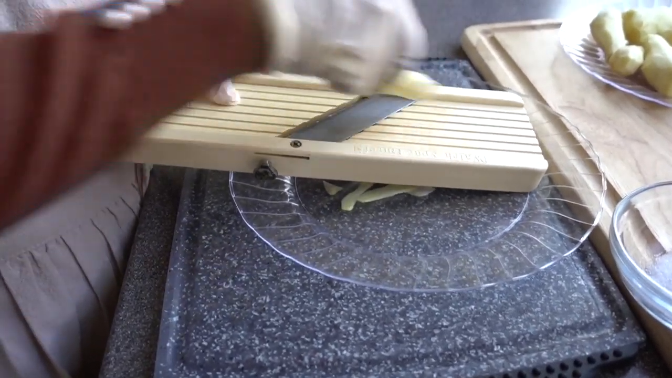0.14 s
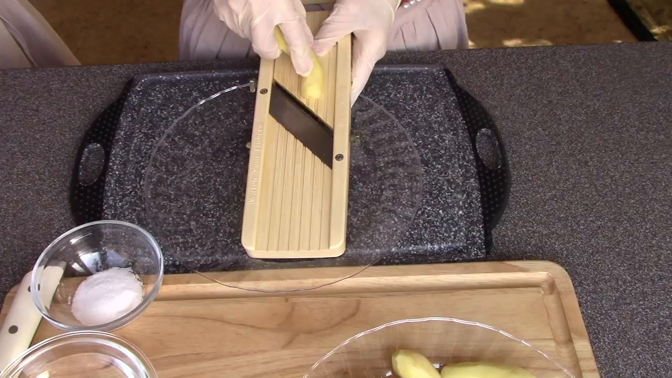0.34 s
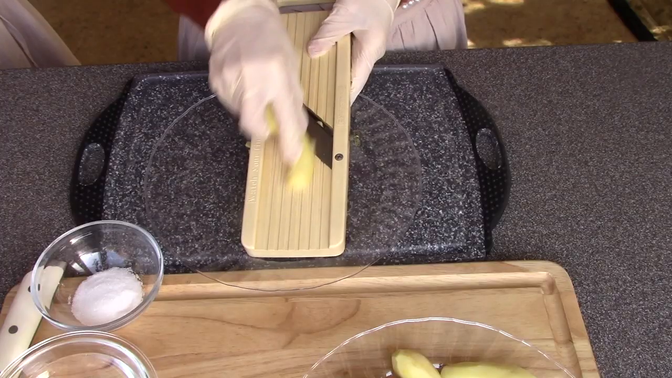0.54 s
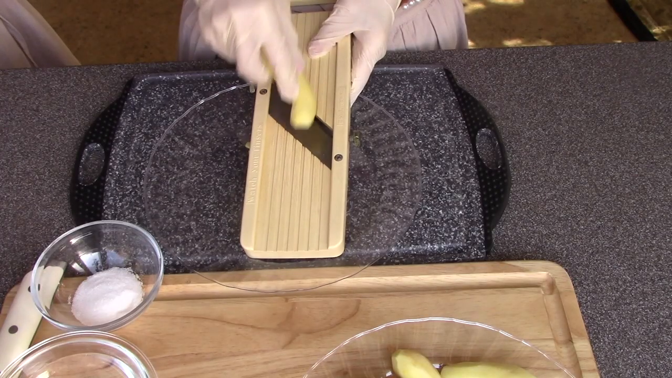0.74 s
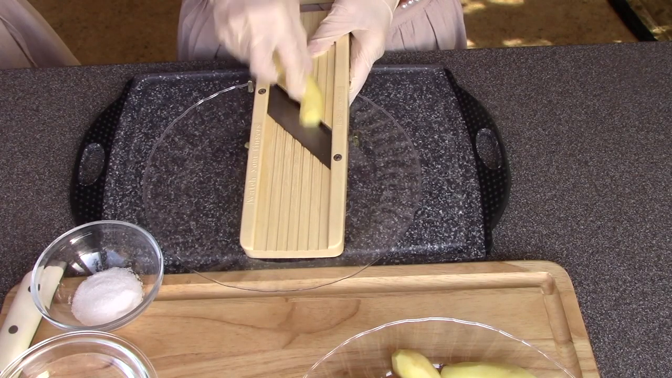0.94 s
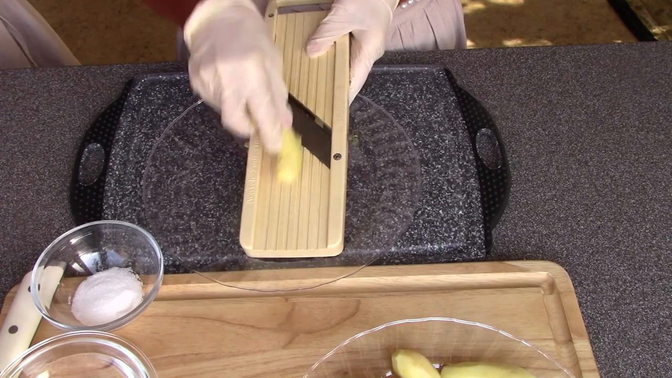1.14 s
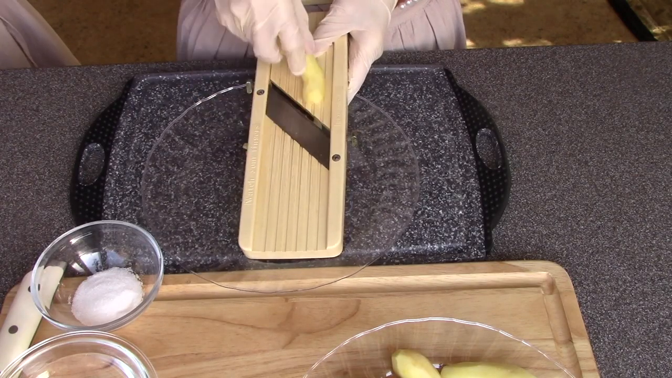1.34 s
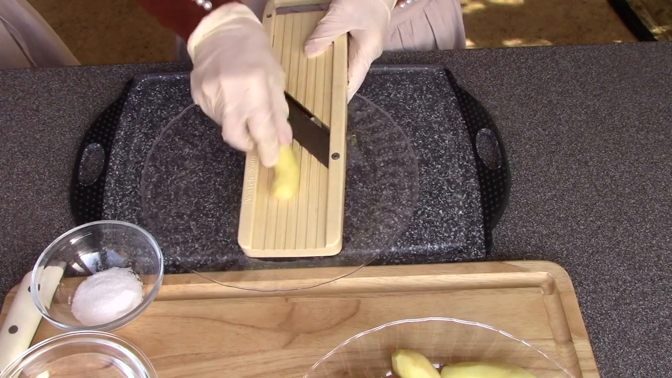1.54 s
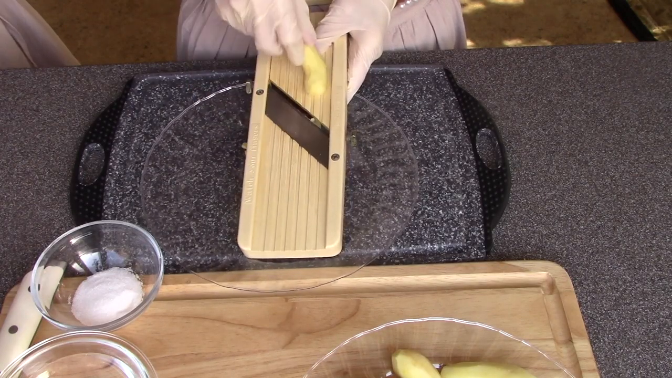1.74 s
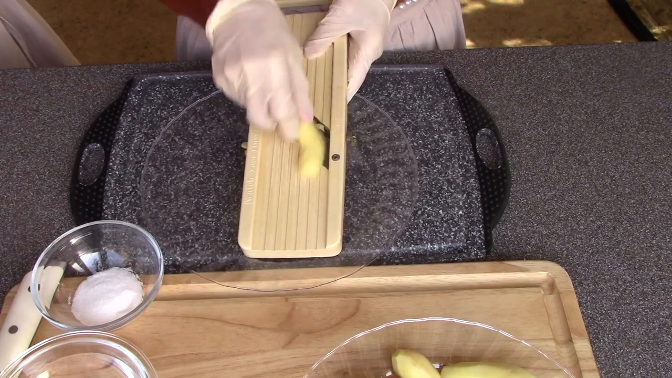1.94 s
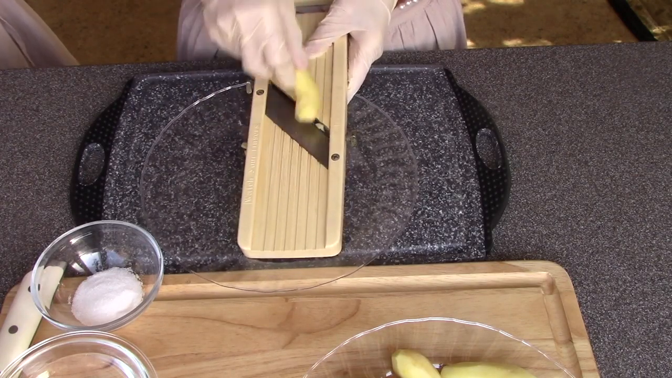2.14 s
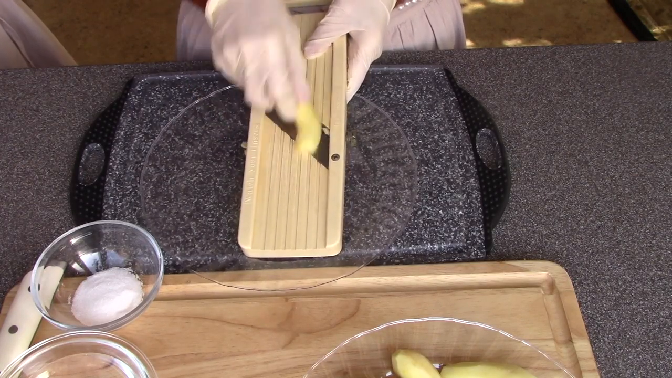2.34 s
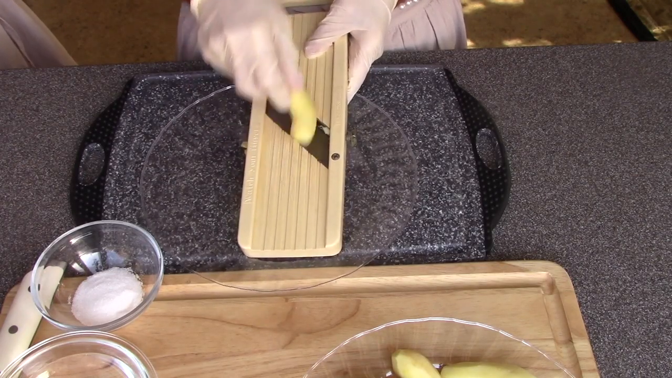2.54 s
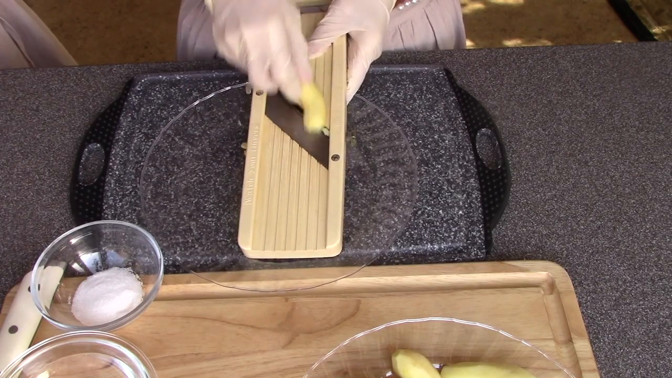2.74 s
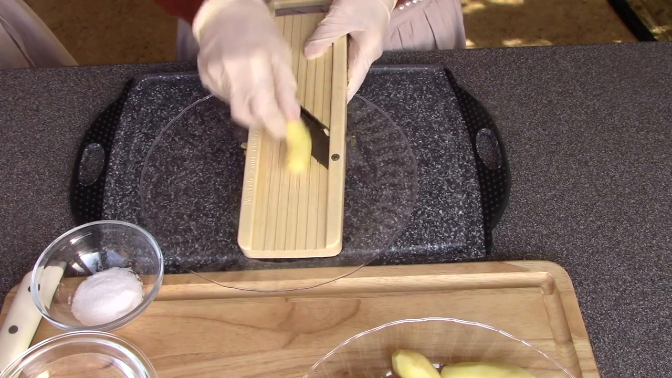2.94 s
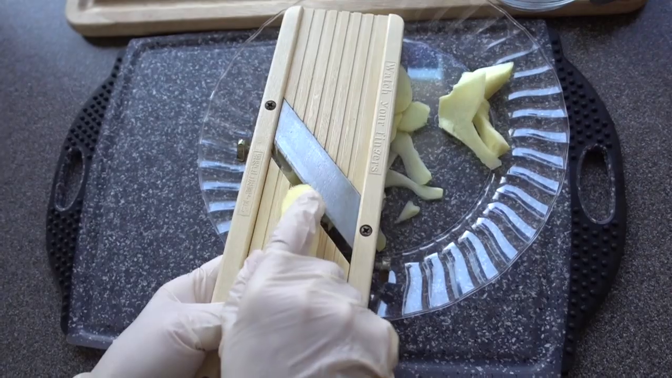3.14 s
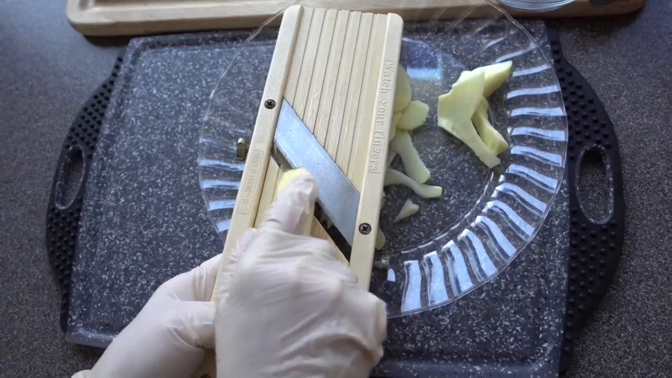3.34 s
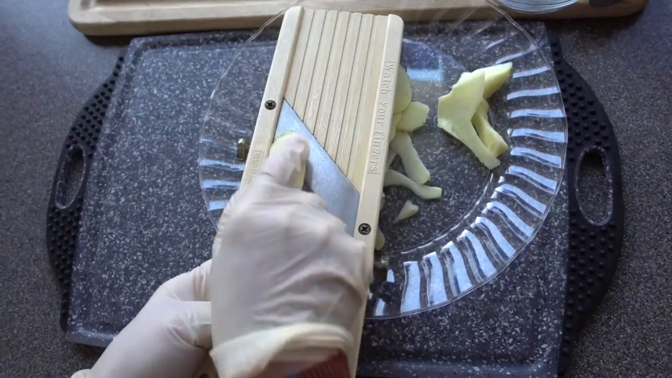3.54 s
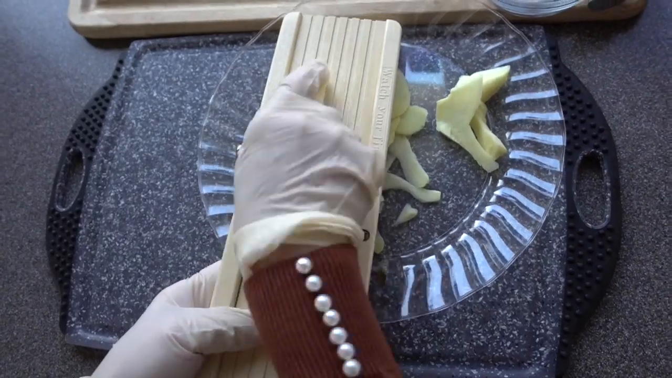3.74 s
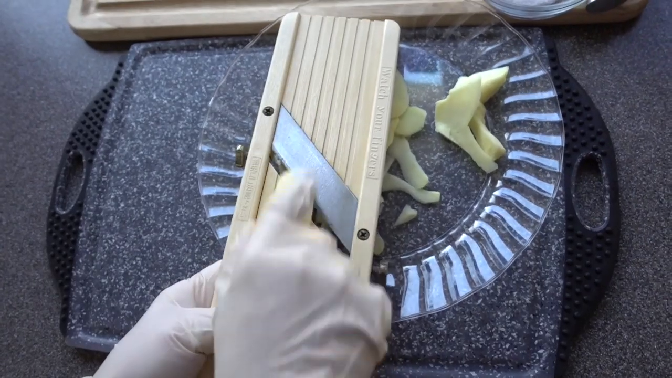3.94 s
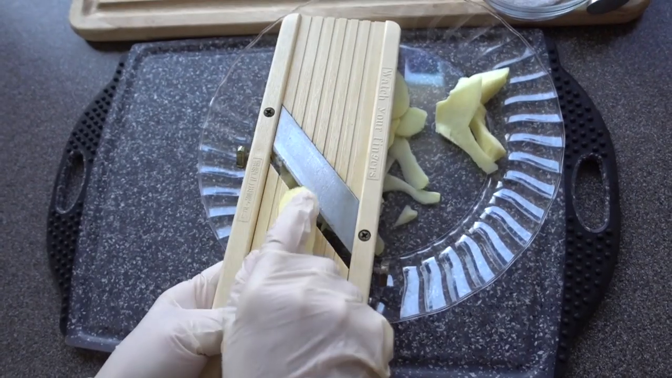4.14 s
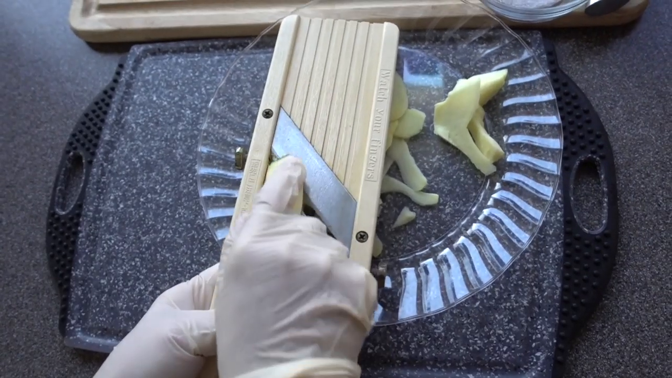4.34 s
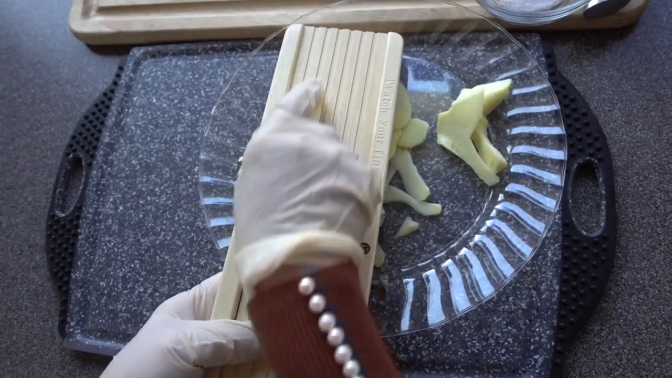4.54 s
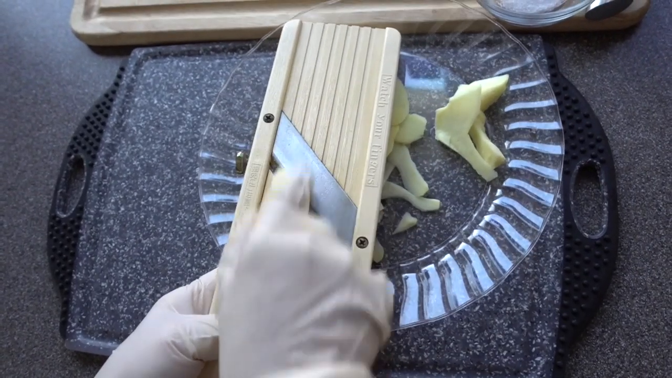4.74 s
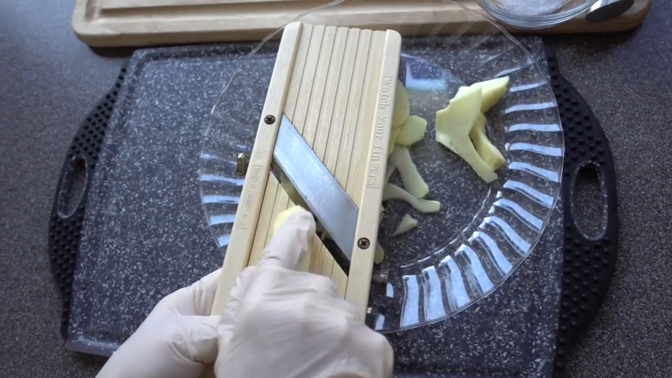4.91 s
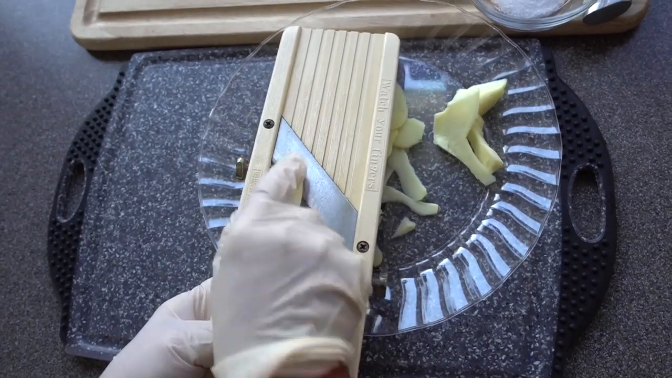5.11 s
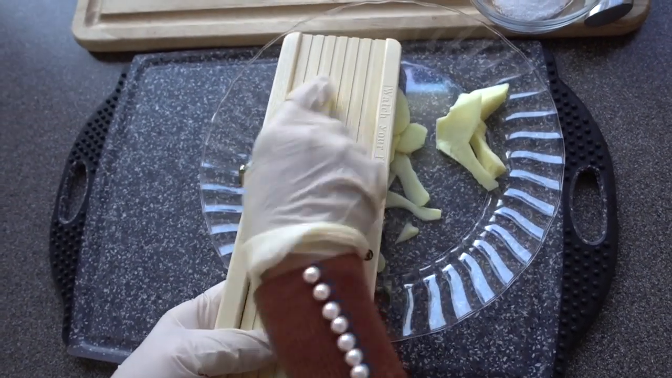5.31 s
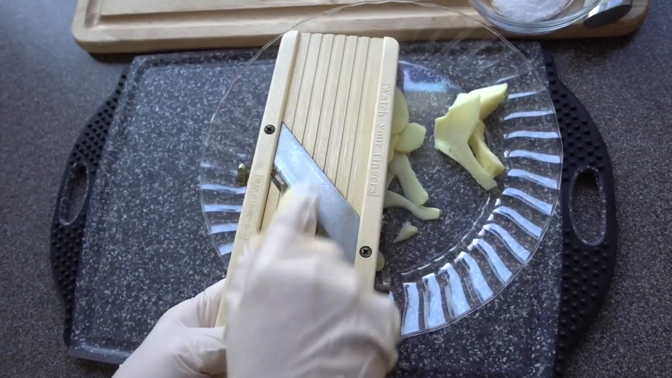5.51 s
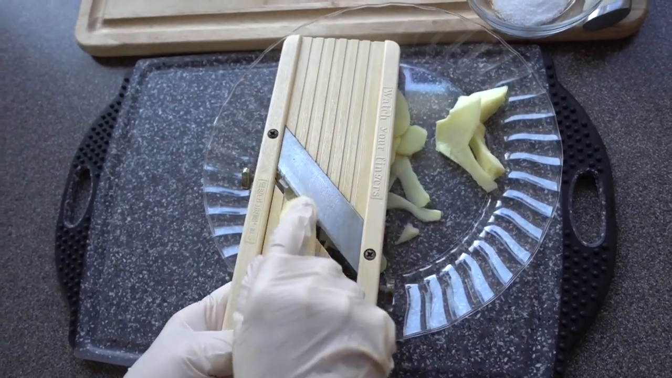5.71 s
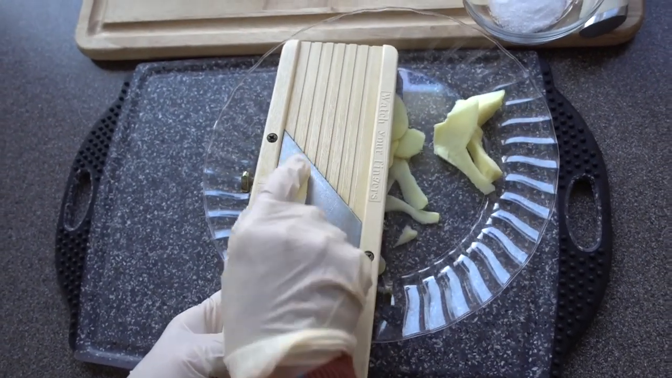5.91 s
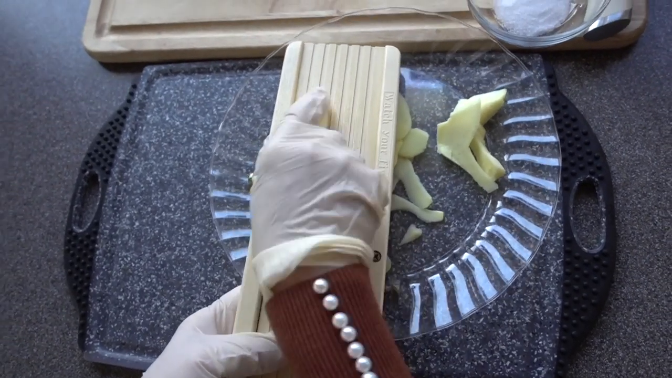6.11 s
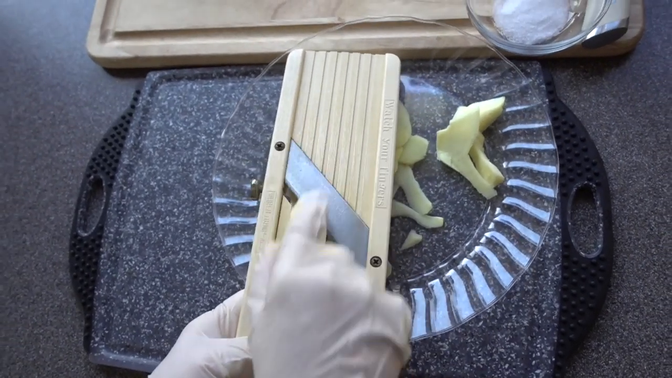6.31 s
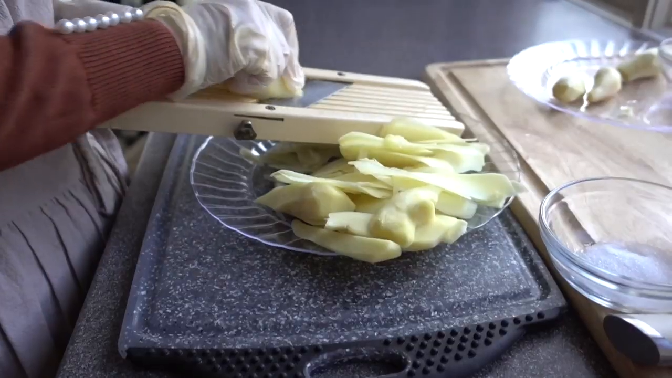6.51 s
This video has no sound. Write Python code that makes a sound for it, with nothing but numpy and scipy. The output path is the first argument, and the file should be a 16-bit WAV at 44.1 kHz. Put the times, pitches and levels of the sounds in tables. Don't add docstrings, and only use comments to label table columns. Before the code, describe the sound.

Fibrous, raspy slicing on a light frame, heard close and bright, leaning strongly to the right. Quick scrapes roughly twice a second alternate with small hollow knocks; then the view moves closer and drier for four slow, swelling cuts with crisp tearing and bright hiss, and knocks between. Small snaps tick off the blade. Faint room tone shifts at abrupt changes of view, ending on a soft quick scrape.

```python
import sys
import numpy as np
from scipy import signal
from scipy.fft import rfft, irfft, next_fast_len
from scipy.io import wavfile
from scipy.ndimage import uniform_filter1d, minimum_filter1d

SR = 44100
rng = np.random.default_rng(int(sys.argv[2]) if len(sys.argv) > 2 else 0)


def master(y):
    cut = np.clip(np.atleast_2d(y).T, -1, 1)
    pcm = np.round(cut * 32767)
    wavfile.write(sys.argv[1], SR, pcm.astype(np.int16))


def volts_from_decibels(level):
    exponent = np.asarray(level, float) / 20
    return 10 ** exponent


N = 289472

# centre_hz, width_hz, level_db
QUICK_FRAME = [(787, 207, -4), (1063, 515, 0), (1408, 172, 1.5), (1817, 143, -8)]
SLOW_FRAME = [(800, 210, -15), (990, 273, -0.5), (1420, 202, 1.5), (1850, 175, -1)]
QUICK_RAMP = [(2266, 290, -0.5), (2863, 254, 8.5), (3380, 100, -12.5)]
SLOW_RAMP = [(2070, 98, -4), (2354, 172, 2.5), (2865, 280, -1), (3077, 240, -1)]
LIGHT_RAMP = [(2280, 270, -3), (2580, 110, -1), (3260, 290, -0.5)]
RASP = [(3640, 1780, -4), (4846, 430, 0), (4820, 380, -5), (5670, 1900, -2.5)]
LIGHT_RASP = [(3800, 85, -15.5), (4515, 170, 9.5), (5720, 1400, 2), (5940, 73, -13.5)]
BLADE = [(7200, 1160, -5.5), (8140, 1070, -1.5), (9200, 2100, -4), (11100, 1500, -3), (13300, 1700, -2.5),
         (13700, 1350, -3), (15730, 590, -3)]
LIGHT_BLADE = [(7170, 140, -10), (8090, 530, 5), (9160, 260, -7), (10240, 800, 1.5), (11200, 350, -4.5),
               (12400, 690, -7), (13700, 610, -7.5)]

# mode_hz, level_db, t60_s
FRAME_MODES = [(800, -10, .022), (1050, -5, .025), (1390, -5, .022), (1700, -5, .018), (1950, -3, .018),
               (2150, -3, .018), (2450, -5, .018), (2900, -5, .015), (3200, -7, .015)]
BRIGHT_MODES = [(3955, 5, 0.018), (4310, 6.5, 0.0054), (4690, 9, 0.0056), (5440, -6, 0.013),
                (5300, -21, 0.023), (8960, -11.5, 0.0137), (9460, -5.5, .01)]

# frequency_hz, density_db (per Hz)
WIDE_HUM = [(59, -87), (100, -28), (281, -13.5), (601, -7.5), (936, -5), (1400, -14), (2090, -14),
            (15500, -46)]
CLOSE_HUM = [(59, -61), (100, -16.5), (530, -1.5), (1180, -4), (2130, -4), (2470, -5.5), (4460, -9.5),
             (15500, -28)]
# start_s, fade_s, tone_db, settle_db (tone offset at the start), reverb_db
VIEWS = [
    (0, .01, -59, 12.5, -17.5),
    (0.433, 0.0045, -51.5, -9.5, -20.5),
    (3.186, 0.0039, -55.5, -5, -26.5),
    (6.439, 0.015, -44, -12.5, -14),
]
# frequency_hz, t60_s
ROOM_T60 = [(300, 1), (1000, 0.6), (2500, 0.33), (6000, 0.4), (14000, 1)]
# frequency_hz, level_db
ROOM_COLOUR = [(300, 37), (1000, 6.5), (2500, 12), (6000, -0.5), (14000, -17)]
# frequency_hz, level_db
SHADOW = [(300, 5), (1200, 4), (2500, -1), (4000, -5), (6000, -14), (9000, -24), (12500, -34), (15500, -60)]
# frequency_hz, level_db
DIFFUSE_LEFT = [(200, -7), (1000, -10), (2500, -15), (5000, -18), (11000, -20), (13000, -23), (15500, -36)]
# frequency_hz, likeness (0-1)
LIKENESS = [(200, 0.62), (400, 0.99), (1200, 1), (2500, 0.8), (4500, 0.97), (9000, .3)]
# frequency_hz, lead_rad
LEAD = [(170, 2), (400, 1.13), (800, 2.31), (2500, 1.4), (6000, 5), (13000, 1.3)]

# start_s, hold_s, ramp_db, frame_db (over ramp), blade_db (over ramp)
QUICK = [
    (-.06, 0.07, -36, -12, -0.5),
    (.44, .075, -42.5, -13.5, 3),
    (0.963, 0.056, -40, -14, 1),
    (1.405, .015, -27, -8, -3.5),
    (1.852, 0.087, -31, -3, -2),
    (2.311, .055, -29, -5, -5.5),
    (2.749, 0.075, -29, -2, -2.5),
    (6.519, 0.089, -46, -41, 3.5),
]
DRAGS = [
    (1.79, 0.015, -40, 3.5, -34),
    (2.249, 0.0066, -56, 10.5, -23),
    (2.679, .01, -67.5, 16.5, -27.5),
    (3.204, .003, -56, -10, -1),
    (6.447, 0.07, -59, -23, -15),
]
RELEASE_DB_PER_S = [382.7, 520, 461, 398.6]
# time_s, push_db, blade_db (over push)
SLOW = [
    [(3.33, -60, -20), (3.406, -53.5, 0), (3.562, -39.5, -1), (3.604, -44.5, 5.5), (3.66, -30.5, -0.5),
     (3.734, -28, 2.5), (3.786, -31.5, -2.5), (3.79, -27.5, -7.5), (3.9, -60.5, -16)],
    [(4.2, -75, -10), (4.224, -50.5, -7), (4.26, -48, -18), (4.318, -51, -4.5), (4.436, -45.5, -2.5),
     (4.508, -28.5, -2), (4.554, -33.5, 0.5), (4.614, -44.5, -10.5), (4.66, -62.5, -9)],
    [(5.012, -53, -15), (5.018, -40.5, -23), (5.046, -40.5, -7), (5.128, -46.5, 2.5), (5.152, -34, -4.5),
     (5.244, -26, -3.5), (5.358, -24.5, -2.5), (5.36, -29.5, -2.5), (5.44, -49, -10.5)],
    [(5.76, -50.5, -6), (5.804, -37.5, -2.5), (5.87, -42, -1.5), (5.97, -28, -5.5), (6.102, -28.5, -3.5),
     (6.154, -25.5, 5), (6.188, -29.5, 2.5), (6.266, -61.5, 4.5), (6.28, -62.5, -8.5)],
]
# skid_db, frame_db, pan_start_db, pan_end_db (left minus right)
SLOW_GRIP = [
    (-14, -5.5, -34, -14),
    (6.5, -1.5, -24, -21.5),
    (4.5, -3.5, -25, -7.5),
    (8.5, -4, -24.5, -8),
]

# time_s, peak_db, ring_db (over body), brightness_db
LANDINGS = [(1.32, -17, 13, -5.5), (1.783, -25.5, -14, -7), (1.794, -16, 12.5, -10), (2.244, -14.5, 11, -7),
            (2.676, -23.5, 8, -9), (3.118, -16.5, 10, -11), (4.058, -15, 8, -16.5), (4.078, -20.5, 1, -14),
            (4.88, -14.5, 4, -17), (5.641, -22.5, -17, -23), (5.647, -15, -5, -15)]
# time_s, peak_db, ring_hz, ring_db (over body), brightness_db
TAPS = [(0.093, -26.5, 1034, 12, -33), (0.163, -32, 1000, -8, -15), (0.361, -44.5, 970, 4, -15),
        (0.593, -31, 990, 8.5, -32.5), (0.66, -39.5, 990, -10, -16), (1.056, -24.5, 2740, -2, -3),
        (1.098, -23.5, 1080, 10.5, -19), (1.69, -43, 2260, 1, -6), (2.586, -41, 1850, -2, -20),
        (3.79, -11.5, 1640, 39, -24), (4.856, -19, 1112, 2.5, -33), (5.021, -30.5, 2330, 33, -31),
        (5.353, -31, 2500, 1, -2.5), (5.445, -20.5, 1560, 47, -22), (5.772, -39, 2620, -1, -14),
        (6.466, -39.5, 2710, 11, -9.5)]
# time_s, peak_db
TICKS = [
    (0.367, -56.5),
    (0.8669, -63),
    (1.1127, -33),
    (1.9669, -13),
    (2.3171, -32),
    (3.4438, -52),
    (5.351, -13),
]
# time_s, pitch_hz, level_db, t60_s
THUD = (1.793, 405, -35, .03)

ATTACK_S, BLADE_LATE_S, RISE_DB = 0.02, 0.006, 35.5
QUICK_RASP_DB, DRAG_RASP_DB, QUICK_PAN_DB = -1, 8.5, -23
SKID_S, FRAME_WAKES_S, FRAME_ASLEEP_DB = 0.11, 0.06, -25.5
FIRM_DB, FRAME_FOLLOWS = -26, 0.14
SLOW_RAMP_DB, SLOW_RASP_DB = -3.5, -4.5
RASP_TAKES, FRAME_YIELDS, EDGE_TURNS = 0.39, 0.7, 1.2
BODY_PAN_TOP_DB = -10.5
LANDING_HZ, LANDING_PAN_DB, TAP_PAN_DB = 2122, -24.5, -14
WORKTOP_T60_S, WORKTOP_DB = 0.3, -12.5
STEP = 16

SIZE = next_fast_len(N + SR)
HZ = np.maximum(np.arange(SIZE // 2 + 1) * SR / SIZE, 1)
TIME = np.arange(N) / SR


def rms_one(x):
    return x / np.sqrt(np.mean(x ** 2) + 1e-20)


def at_hz(points, hz=HZ):
    table = np.array(points)
    return np.interp(np.log(hz), np.log(table[:, 0]), table[:, 1])


def cut(x, hz, kind):
    return signal.sosfilt(signal.butter(4, hz, kind, fs=SR, output="sos"), x)


def wobble(db, rate, size):
    r = np.exp(-64 * np.pi * rate / SR)
    slow = signal.lfilter([1], [1, -2 * r, r * r], rng.standard_normal(N // 32 + 1002))[1000:]
    return np.interp(np.arange(size) / 32, np.arange(len(slow)), volts_from_decibels(db * rms_one(slow)))


def far_side(alike, other, colour):
    like = np.clip(at_hz(LIKENESS), 0, 1)
    coherent = like * alike * np.exp(1j * at_hz(LEAD))
    return volts_from_decibels(at_hz(colour)) * (coherent + np.sqrt(1 - like ** 2) * other)


def room_tone(colour):
    right, other = rfft(rng.standard_normal((2, SIZE))) * volts_from_decibels(at_hz(colour))
    tone = irfft([far_side(right, other, DIFFUSE_LEFT), right], SIZE)[:, :N]
    return tone / np.std(tone[1]) * wobble(0.27, 4.0, N)


def kitchen():
    t, out = np.arange(SR) / SR, 0
    edges = 150 * 2 ** np.arange(0, 7, 0.75)
    for low, high in zip(edges, edges[1:]):
        sos = signal.butter(2, [low, high], "band", fs=SR, output="sos")
        band = signal.sosfilt(sos, rng.standard_normal((2, SR)))
        out = out + band * volts_from_decibels(-60 * t / at_hz(ROOM_T60, np.sqrt(low * high)))
    out *= np.clip(t / 0.0026, 0, 1)
    near = rng.standard_normal((2, SR)) * volts_from_decibels(-60 * t / WORKTOP_T60_S) * np.clip(t / 0.0056, 0, 1)
    late = rfft(out / np.linalg.norm(out[0]), SIZE) * volts_from_decibels(at_hz(ROOM_COLOUR))
    early = rfft(near / np.linalg.norm(near[0]), SIZE)
    right, other = late + volts_from_decibels(WORKTOP_DB) * early
    return np.array([far_side(right, other, DIFFUSE_LEFT), right])


def tearing(per_s, spread_db, smooth):
    sizes = volts_from_decibels(spread_db * np.minimum(rng.exponential(1, N), 4)) * rng.choice([-1, 1], N)
    snaps = sizes * (rng.random(N) < per_s / SR)
    return rms_one(snaps) + smooth * rng.standard_normal(N)


def resonate(force, peaks, flutter_db, flutter_rate):
    out = 0
    for k, (hz, width, db) in enumerate(peaks):
        r = np.exp(-np.pi * width / SR)
        poles = [1, -2 * r * np.cos(2 * np.pi * hz / SR), r * r]
        peak = signal.lfilter([1 - r * r, 0, r * r - 1], poles, force)
        out = out + (-1) ** k * volts_from_decibels(db) * peak * wobble(flutter_db, flutter_rate, len(force))
    return rms_one(out)


def flick(start, hold, ramp_db, frame_db, blade_db, rasp_db):
    tops = ramp_db + np.array([[frame_db], [0], [blade_db + rasp_db], [blade_db]])
    t = TIME[::STEP] - start
    rise_s = ATTACK_S + BLADE_LATE_S * np.array([[0], [0], [1], [1]])
    rise = np.clip(1 - t / rise_s, 0, 1)
    fall = np.maximum(t - ATTACK_S - hold, 0) * np.array(RELEASE_DB_PER_S)[:, None]
    return np.where(t >= 0, tops - RISE_DB * rise - fall, -200)


def efforts():
    passes = [flick(*row, QUICK_RASP_DB) for row in QUICK]
    passes += [flick(*row, DRAG_RASP_DB) for row in DRAGS]
    levels = np.max(passes, axis=0)
    levels = np.vstack([levels, np.full(levels.shape[1], QUICK_PAN_DB)])
    levels[:, levels[:4].max(axis=0) < -80] = np.nan
    for rows, grip in zip(SLOW, SLOW_GRIP):
        layers, on, pan_db = press(rows, *grip)
        levels[:, on] = np.vstack([layers, pan_db])[:, on]
    return np.repeat(levels, STEP, axis=1)[:, :N]


def strokes():
    levels = efforts()
    on = ~np.isnan(levels[0])
    frame_db, ramp_db, rasp_db, hiss_db, pan_db = levels[:, on]
    contact = np.clip(2 * uniform_filter1d(on * 1.0, size=700)[on] - 1, 0, 1)
    force = tearing(3000.0, spread_db=1.0, smooth=0.82)[on]
    fine = tearing(9000.0, spread_db=4.5, smooth=0.1)[on]
    close = (TIME[on] > VIEWS[2][0]) & (TIME[on] < VIEWS[3][0])
    slow_frame = resonate(force, SLOW_FRAME, 1.76, 22.0)
    frame = np.where(close, slow_frame, resonate(force, QUICK_FRAME, 2.7, 32.0))

    blade_db = np.nan_to_num(levels[3], nan=-99)
    held_db = -minimum_filter1d(-blade_db, size=4001, origin=2000)[on]
    pressed = np.where(close, np.clip((held_db + 46.5) / 10.0, 0.1, 1), 1)
    firm, light = np.sqrt(pressed), np.sqrt(1 - pressed)
    slow_ramp = firm * resonate(force, SLOW_RAMP, 2.2, 45.0) + light * resonate(force, LIGHT_RAMP, 3.8, 4.9)
    ramp = np.where(close, slow_ramp, resonate(force, QUICK_RAMP, 1.66, 26.0))
    rasp = firm * resonate(force, RASP, 2.5, 15.0) + light * resonate(force, LIGHT_RASP, 3.5, 11)
    hiss = firm * resonate(fine, BLADE, 2.0, 12.0) + light * resonate(fine, LIGHT_BLADE, 3.5, 10)

    low = volts_from_decibels(frame_db) * cut(frame, 806.0, "high") + volts_from_decibels(ramp_db) * cut(ramp, 1960.0, "high")
    high = volts_from_decibels(rasp_db) * cut(rasp, 3200.0, "high") + volts_from_decibels(hiss_db) * cut(hiss, 7100.0, "high")
    stick_slip = volts_from_decibels(6.0) * wobble(0.79, 90.0, len(low)) * contact
    far = low * volts_from_decibels(np.minimum(pan_db, BODY_PAN_TOP_DB)) + high * volts_from_decibels(pan_db)
    out = np.zeros((2, N))
    out[:, on] = stick_slip * [far, low + high]
    return out


def ring(clicks, hz, t60):
    r, w = volts_from_decibels(-60 / (t60 * SR)), 2 * np.pi * hz / SR
    return signal.lfilter([0, np.sin(w)], [1, -2 * r * np.cos(w), r * r], clicks + 1e-18)


def knocks():
    out, span = np.zeros((2, N)), round(SR / 8)
    t = np.arange(span) / SR
    landing = np.clip(t / 0.00056, 0, 1) * (np.exp(-t / 0.003) + 0.41 * np.exp(-t / 0.016))
    blows = [(s, db, LANDING_HZ, *tone, LANDING_PAN_DB) for s, db, *tone in LANDINGS]
    blows += [(*row, TAP_PAN_DB) for row in TAPS]
    for s, db, hz, ring_db, bright_db, pan_db in sorted(blows):
        chatter = rng.standard_normal(span) * (rng.random(span) < 0.3) * landing
        chatter = signal.lfilter([0.4], [1, -0.6], chatter)
        strengths, detune = rng.normal(0, 2, 20), rng.normal(1, 0.03, 20)
        body = 0
        for (f, d, t60), e, k in zip(FRAME_MODES, strengths, detune):
            body = body + volts_from_decibels(d + e) * ring(chatter, f * k, t60)
        standout = rms_one(ring(chatter, hz, 0.018))
        body = cut(rms_one(body) + volts_from_decibels(ring_db - 4) * standout, 3600, "low")
        body = cut(cut(body, 760, "high"), 700, "high")
        edge = 0
        for (f, d, t60), e in zip(BRIGHT_MODES, strengths[::-1]):
            edge = edge + volts_from_decibels(d + e) * ring(chatter, f, t60)
        edge = cut(cut(edge, 3330.0, "high"), 12000.0, "low")
        knock = rms_one(body) + volts_from_decibels(bright_db) * rms_one(edge)
        at = round((s - 0.001) * SR)
        knock = knock[:N - at] * volts_from_decibels(db + 1.0) / np.abs(knock).max()
        out[:, at:at + span] += knock * volts_from_decibels([[pan_db], [0]])
    return out


def ticks():
    burst = sum(volts_from_decibels(db + 3.0) * (TIME > s) * np.exp(-np.abs(TIME - s) / 0.0029) for s, db in TICKS)
    snaps = cut(cut(burst * rng.standard_normal(N), 6000.0, "high"), 12700.0, "low")
    return snaps * volts_from_decibels([[-20.0], [0]])


def thud():
    s, hz, db, t60 = THUD
    push = rng.standard_normal(N) * (TIME > s) * np.exp(-np.abs(TIME - s) / 0.012)
    knock = cut(cut(ring(push, hz, t60), 300, "high"), 520, "low")
    return volts_from_decibels(db + 2.5) * knock / np.abs(knock).max() * volts_from_decibels([[-8.0], [0]])


def press(rows, skid_db, frame_db, pan_from_db, pan_to_db):
    s, push_db, edge_db = np.transpose(rows)
    now = TIME[::STEP]
    push, edge = np.interp(now, s, push_db), np.interp(now, s, edge_db)
    t = np.maximum(now - s[0], 0)
    sings = np.maximum(edge, 0) * np.clip((push + 44.0) / 10.0, 0, 1)
    skid = skid_db * np.exp(-t / SKID_S)
    frame = push - FRAME_YIELDS * sings + frame_db + FRAME_FOLLOWS * (push - FIRM_DB)
    frame = frame + FRAME_ASLEEP_DB * np.exp(-t / FRAME_WAKES_S)
    ramp = push + SLOW_RAMP_DB - np.maximum(skid, 0) / 2 - FRAME_YIELDS * sings / 2
    rasp = push + SLOW_RASP_DB + skid + RASP_TAKES * sings
    blade = push + edge + sings / 2
    on = (now >= s[0]) & (now <= s[-1])
    pan_db = np.interp(now, s[[0, -1]], [pan_from_db, pan_to_db]) + EDGE_TURNS * sings
    return [frame, ramp, rasp, blade], on, pan_db


def scene():
    left, right = strokes() + knocks() + ticks()
    scatter = rng.standard_normal(SR // 20) * np.exp(-np.arange(SR // 20) / SR / 0.003)
    left = rfft(left, SIZE)
    scattered = left * rfft(scatter / np.linalg.norm(scatter), SIZE)
    shadowed = irfft(far_side(left, scattered, SHADOW), SIZE)[:N]
    direct = np.array([shadowed, right]) + thud()

    room, wide, close = kitchen(), room_tone(WIDE_HUM), room_tone(CLOSE_HUM)
    fade_in = [np.clip((TIME - s) / fade, 0, 1) if s else 1 for s, fade, *_ in VIEWS]
    fade_out = [np.clip((s - TIME) / fade, 0, 1) for s, fade, *_ in VIEWS[1:]] + [1]
    out = 0
    for view, tone, up, down in zip(VIEWS, [wide, wide, close, wide], fade_in, fade_out):
        s, _, tone_db, settle_db, reverb_db = view
        gate = up * down
        reverb = irfft(rfft(right * gate, SIZE) * room, SIZE)[:, :N]
        tone_gain = volts_from_decibels(tone_db + settle_db * np.exp(-np.abs(TIME - s) / 0.5))
        out = out + gate * (direct + volts_from_decibels(reverb_db) * reverb + tone_gain * tone)
    return out


def band_limit(x):
    return signal.sosfilt(signal.butter(12, 16100, fs=SR, output="sos"), x)


def record(dry):
    x = signal.sosfilt(signal.butter(3, 350.0, "high", fs=SR, output="sos"), dry)
    x = signal.sosfilt(signal.cheby2(14, 60, 16300, fs=SR, output="sos"), x)
    return band_limit(x)


dry = scene()
out = record(dry)
master(out)
```